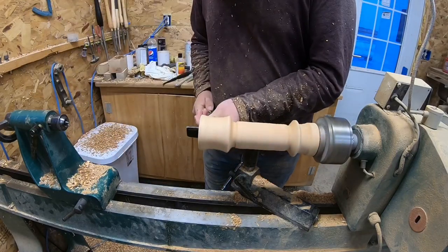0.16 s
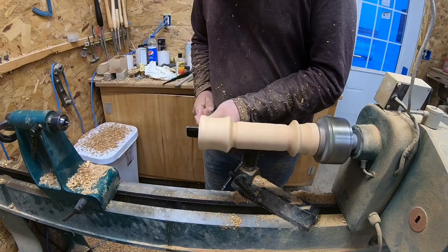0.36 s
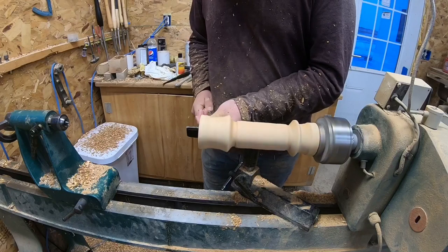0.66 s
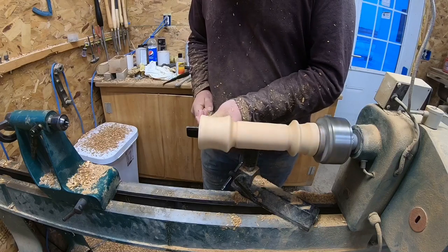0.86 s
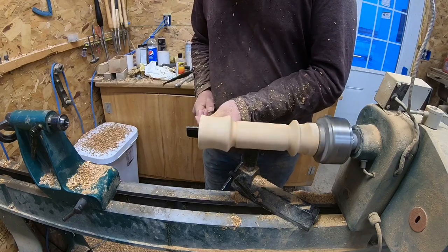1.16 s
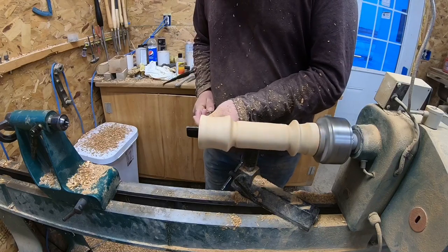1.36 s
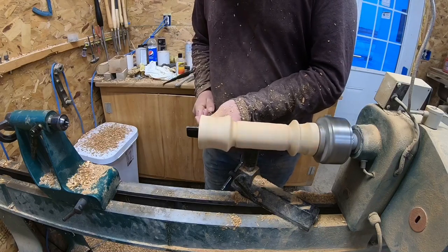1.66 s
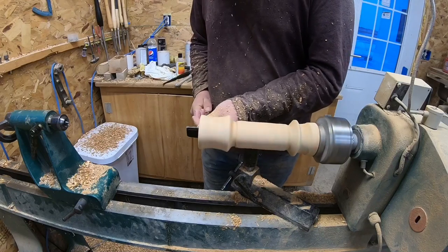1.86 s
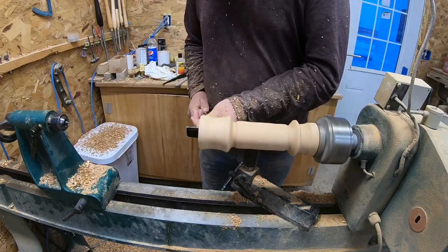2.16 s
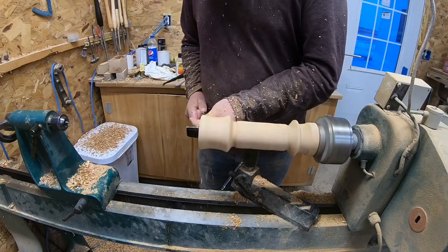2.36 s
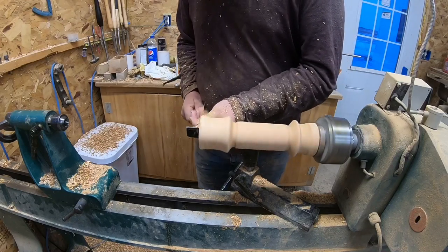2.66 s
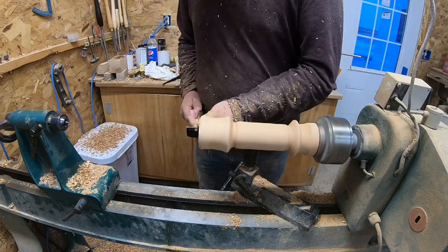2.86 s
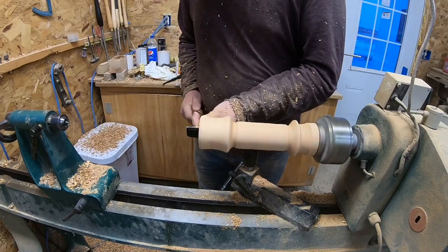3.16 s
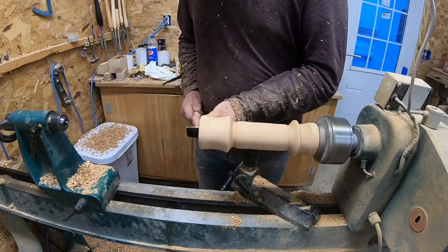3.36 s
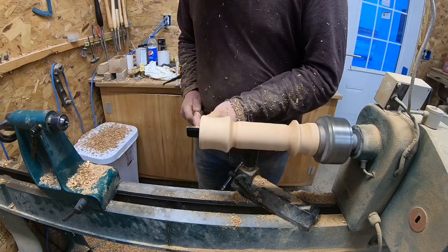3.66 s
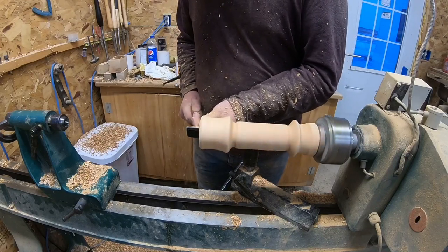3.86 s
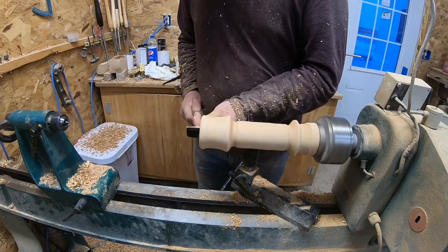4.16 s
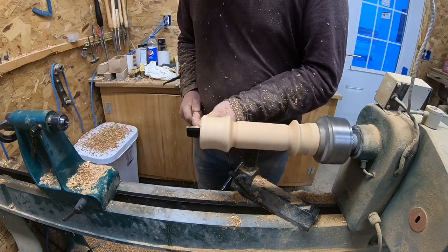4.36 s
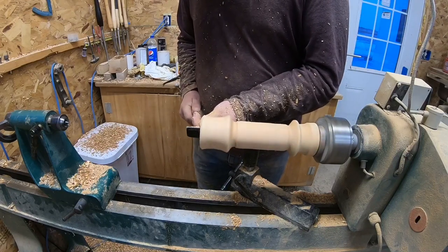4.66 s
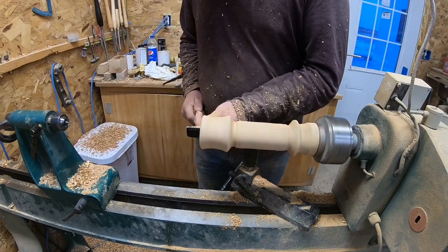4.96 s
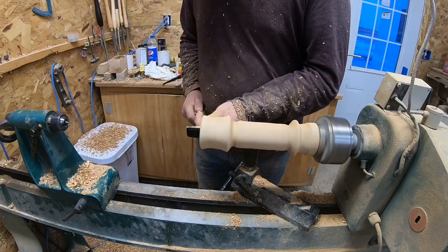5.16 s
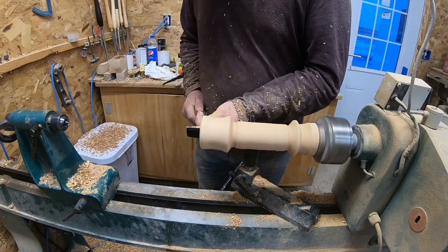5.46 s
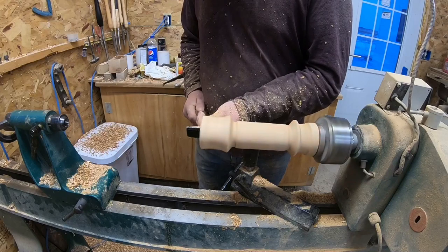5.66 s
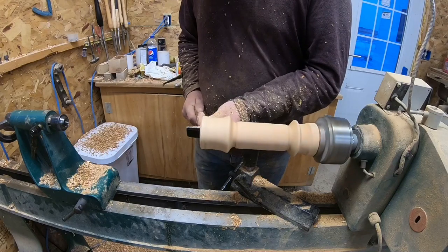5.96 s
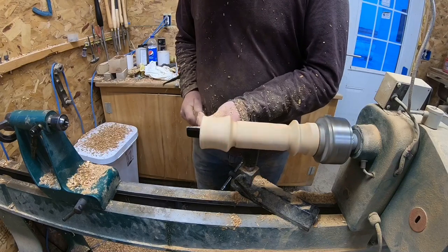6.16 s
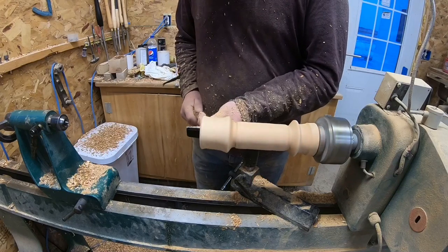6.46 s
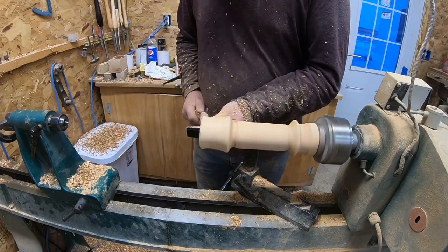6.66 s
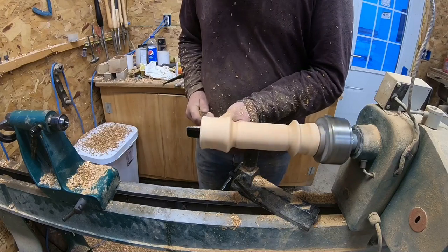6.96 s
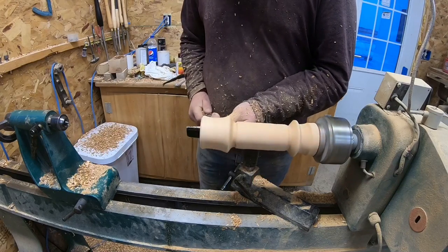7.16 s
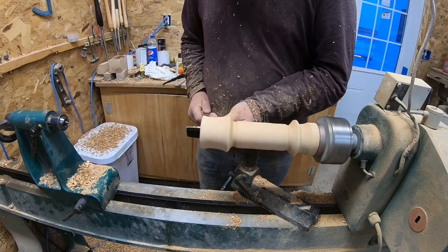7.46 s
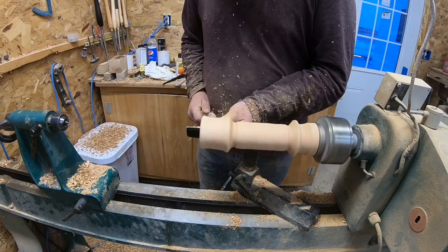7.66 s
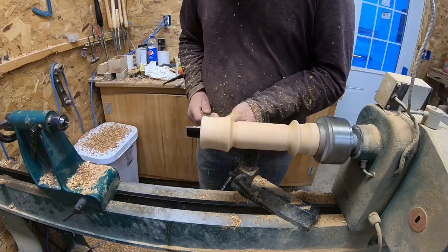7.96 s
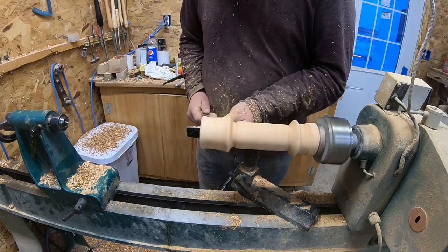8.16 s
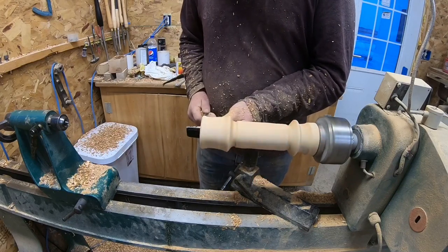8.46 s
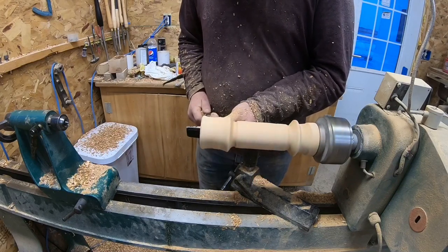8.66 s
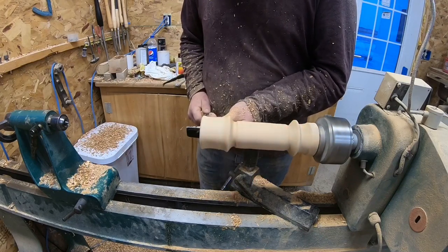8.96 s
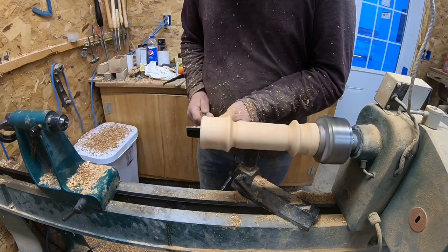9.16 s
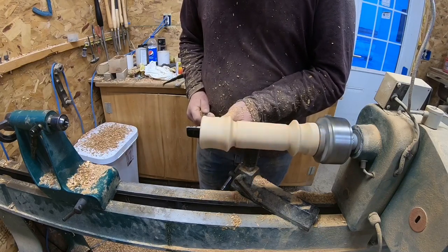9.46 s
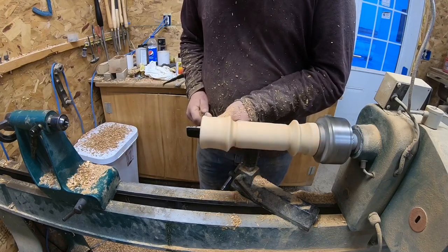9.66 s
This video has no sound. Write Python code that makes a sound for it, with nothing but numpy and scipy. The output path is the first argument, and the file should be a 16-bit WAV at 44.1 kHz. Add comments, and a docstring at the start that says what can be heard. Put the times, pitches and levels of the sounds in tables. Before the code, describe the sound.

Sandpaper pressed on spinning wood makes swelling, gritty rubbing strokes with a hollow moan, over the steady hum of a lathe.

```python
"""Abrasive pressed, stroke by stroke, on the end of a blank spinning in a wood lathe.
The grit hisses and rasps, pulsing once a turn; the overhanging blank rings at its bending note
and, in two spells under firm pressure, chatters by itself. The drive whines steadily underneath.
One microphone across the lathe bed, in a small workshop with wooden walls; its gain ducks on swells."""
import sys
import numpy as np
from scipy import signal
from scipy.fft import rfft, irfft, next_fast_len
from scipy.io import wavfile
from scipy.ndimage import uniform_filter1d, map_coordinates

SR = 44100
rng = np.random.default_rng(int(sys.argv[2]) if len(sys.argv) > 2 else 0)


def wav_record(signal):
    """Record a signal, one row per channel, as 16-bit PCM in the file named by sys.argv[1]."""
    frames = np.transpose(np.atleast_2d(signal))
    bounded = np.clip(frames, -1, 1)
    # unit amplitude maps onto the largest positive 16-bit level
    quanta = np.round(bounded * 32767).astype(np.int16)
    wavfile.write(sys.argv[1], SR, quanta)


N = 432621
TIME_S = np.arange(N) / SR
TURN_HZ = 64.23


def amp(db):
    """Decibels to gain."""
    return 10 ** (np.asarray(db) / 20)


def unit(x):
    """x scaled to rms 1."""
    return x / np.sqrt(np.mean(x ** 2) + 1e-20)


def bell(offset_s, width_s):
    """A bell curve, 1 at zero offset."""
    return np.exp(-np.minimum(np.abs(offset_s) / width_s, 10) ** 2)


def along(points, hz):
    """Rows of freq_hz, value, read on a log frequency axis."""
    freqs, values = np.transpose(points)
    return np.interp(np.log(hz + 1), np.log(freqs + 1), values)


def curves(rows):
    """One value per sample for each column after time_s."""
    times, *columns = np.transpose(rows)
    return [np.interp(TIME_S, times, column) for column in columns]


def wobble(rate):
    """A smooth random curve, rate knots a second."""
    knots = np.arange(N) * rate / SR
    coarse = knots[::32]
    return np.interp(knots, coarse, map_coordinates(rng.standard_normal(int(knots[-1]) + 4), [coarse]))


def angle(hz):
    """Running phase of a frequency curve."""
    return 2 * np.pi * np.cumsum(hz * np.ones(N)) / SR


def filtered(x, response):
    """x through a complex frequency response."""
    size = next_fast_len(N + SR // 2)
    return irfft(rfft(x, size) * response(np.fft.rfftfreq(size, 1 / SR)), size)[:N]


def coloured(x, spectrum):
    """x shaped by a spectrum, at rms 1."""
    return unit(filtered(x, lambda hz: amp(along(spectrum, hz))))


def resonate(x, modes, below, above):
    """x through modes, at rms 1; it falls steeply a factor below the first and above the last."""
    low_hz, high_hz = modes[0][0] / below, modes[-1][0] * above

    def response(f):
        ring = sum(amp(db) * 1j * f * width / (hz * hz - f * f + 1j * f * width)
                   for hz, width, db in modes)
        return ring / (1 + (f / high_hz) ** 8 + (low_hz / (f + 1)) ** 16)
    return unit(filtered(x, response))


def gliding(x, centre_hz, width_hz):
    """x through one resonance whose centre follows a curve, at rms 1."""
    carrier = np.exp(1j * angle(centre_hz))
    lowpass = signal.butter(2, width_hz / 2, fs=SR)
    return unit(np.real(carrier * signal.lfilter(*lowpass, x / carrier)))


# Decay of the small workshop: freq_hz, t60_s
ROOM_DECAY = [(200, 0.29), (2000, 0.16), (12000, 0.062)]


def workshop(x, wet_db):
    """x with the short answer of the wooden walls, which reaches the microphone just after it."""
    hz, t, noise = signal.stft(rng.standard_normal(SR // 2), SR, nperseg=256)
    decay = amp(-60 * t / along(ROOM_DECAY, hz)[:, None])
    tail = signal.istft(noise * decay, SR, nperseg=256)[1]
    echo = signal.fftconvolve(x, np.pad(tail, (SR // 300, 0)) / np.linalg.norm(tail))[:N]
    return (x + amp(wet_db) * echo) / np.sqrt(1 + amp(wet_db) ** 2)


# Steady whine of motor and belt drive: pitch_hz, relative_db
DRIVE_TONES = [(802, -46), (1006, -47.5), (1070.2, -41.5), (1174, -46.5), (1626, -55.5), (1704, -42.5),
               (1758, -52), (1883, -52), (2407, -52.5), (4452, -61), (4834, -59), (5324, -64),
               (5636, -60.5)]
# Tones of the spindle: turn_multiple, relative_db
SPINDLE_TONES = [(9, -46), (10, -44), (12, -40), (27, -46.5), (30, -48.5), (42, -58), (72, -60), (74, -62)]
# Rise and fall of the motor's hum: time_s, relative_db
HUM_LEVELS = [(0, -44), (1.9, -43), (2.26, -47.5), (2.6, -41.5), (4.9, -43.5), (6.1, -47.5), (7, -44),
              (9.8, -44.5)]


def drive(tones_db, hum_db, hum_hz):
    """Motor and spindle under the sanding: their tones waver a little with the speed."""
    speed = 1 + 0.000295 * wobble(3)

    def tone(hz):
        return np.sqrt(2) * amp(0.6 * wobble(20)) * np.sin(angle(hz * speed) + 0.15 * wobble(18))
    lines = list(DRIVE_TONES) + [(k * TURN_HZ, db) for k, db in SPINDLE_TONES]
    whine = sum(amp(db + 1.4 * wobble(4)) * tone(hz) for hz, db in lines)
    hum = amp(curves(HUM_LEVELS)[0] + hum_db) * tone(hum_hz)
    return hum + amp(tones_db) * whine


# Rumble of belt and fan: freq_hz, gain_db
RUMBLE_SPECTRUM = [(25, -32), (80, -23), (115, -17.5), (175, -4), (300, -0.5), (450, 2), (750, 11.5),
                   (900, 4.5), (1150, 8), (1400, -3), (2000, -19), (4000, -58)]
# Rush of the bearings: freq_hz, gain_db
BEARING_SPECTRUM = [(800, -37), (1300, 1.5), (1500, -2), (1740, 11), (2000, 3), (2400, -16), (3500, -11.5),
                    (5300, -6.5), (6400, -15), (9300, -70), (12000, -32), (15800, -14)]


def running_noise(rumble_db, bearings_db):
    """Belt and fan rumble evenly; the bearings' fluttering rush carries into the room."""
    rumble = coloured(rng.standard_normal(N), RUMBLE_SPECTRUM)
    bearings = coloured(rng.standard_normal(N) * amp(4.2 * wobble(120)), BEARING_SPECTRUM)
    return amp(rumble_db) * rumble + amp(bearings_db) * workshop(bearings, wet_db=-12)


# The abrasive's edge catches on three turns running: start_s, relative_db
EDGE_CATCHES = [(7.115, -23), (7.1293, -24.5), (7.147, -30)]
# Colour of one snag: freq_hz, gain_db
SNAG_SPECTRUM = [(80, -45), (250, -14), (700, -2), (2200, 0), (3500, -8), (6000, -10), (9000, -20),
                 (15000, -13)]


def catches(t60_s):
    """A short burst of tearing each time the edge snags."""
    bursts = sum(amp(db - 60 * np.abs(TIME_S - start) / t60_s) * (TIME_S >= start)
                 for start, db in EDGE_CATCHES)
    return np.sqrt(np.mean(bursts ** 2)) * coloured(bursts * rng.standard_normal(N), SNAG_SPECTRUM)


# Strokes of the abrasive on the end of the blank:
# start_s, end_s, attack_s, release_s, pressure_db, hiss_db, sizzle_db, turn_swing_db
HAND_STROKES = [(0.235, 1.066, 0.038, 0.054, -23.5, -32, -42, 6.5),
                (1.175, 1.342, 0.2, 0.13, -31.5, -37.5, -53, 7),
                (1.418, 1.61, 0.074, 0.036, -25.5, -30.5, -42, 5.5),
                (1.742, 1.886, 0.076, 0.042, -33, -35, -48, 4),
                (1.945, 2.354, 0.051, 0.31, -24, -32.5, -45, 2.5),
                (2.735, 2.751, 0.087, 0.032, -10, -21.5, -34, 3.5),
                (3.365, 3.474, 0.074, 0.13, -27, -33, -44, 2.5),
                (3.678, 3.896, 0.023, 0.11, -21, -28.5, -41, 3),
                (4.124, 4.336, 0.091, 0.097, -22.5, -31.5, -41, 2),
                (4.56, 4.74, 0.13, 0.074, -26, -33, -45, 3), (5.123, 5.529, 0.3, 0.23, -20, -28, -41, 0.5),
                (5.72, 6.355, 0.21, 0.46, -19, -31, -37, 4.5),
                (6.48, 6.984, 0.23, 0.13, -24, -35, -38.5, 8), (7.127, 7.182, .02, .15, -23, -41, -43, 4.5),
                (7.282, 7.695, 0.13, 0.16, -23, -41.5, -40, 6),
                (7.844, 8.3, 0.055, 0.36, -22.5, -41.5, -38.5, 2),
                (8.385, 8.53, 0.13, 0.22, -28, -42, -42, 4), (8.836, 9.10, 0.14, 0.15, -22, -40, -38, 0.5),
                (9.285, 9.444, 0.14, .10, -22, -37, -39, 6.5),
                (9.57, 9.64, .16, 0.084, -27, -38.5, -42, 5.5),
                (9.74, 9.797, 0.084, 0.098, -13.5, -32, -36, 4)]
# The fingers briefly push harder or ease off: time_s, added_pressure_db, added_bite_db
FINGER_PUSHES = [(0.34, -1.5, 4), (0.46, -10, 2.5), (0.88, 5, -2.5), (1.5, 1.5, 0.5), (2.735, -0.5, 3),
                 (2.88, -4, 1), (3.16, 5, -2.5), (4.21, 5, -1), (4.65, 4, 1), (5.21, -3.5, 4.5),
                 (5.275, 2.5, 0), (5.385, 3.5, -1), (5.8, 3, 2), (6.37, 1.5, 2), (6.56, 7.5, 2.5),
                 (6.73, -5, 3.5), (6.87, 5.5, 1), (7.32, 6, 1.5), (7.5, 5.5, -1), (7.875, 7, 0.5),
                 (8.07, 5, 0.5), (8.23, 8.5, -2.5), (8.87, 6.5, 3), (9.09, 8, -2.5), (9.32, 7, 1.5)]


def hand():
    """Pressure, bite, hiss and sizzle in dB: each stroke lands, arches in pressure and lifts."""
    press, hiss, sizzle = -35.5, -54, -55  # the abrasive grazes between strokes
    edge_db = 22.5  # fall over one attack or release time
    lag = 1.15  # pressure comes and goes this many times more slowly than the hiss
    for start, end, attack, release, press_db, hiss_db, sizzle_db, _ in HAND_STROKES:
        lift_db = edge_db * (np.maximum(start - TIME_S, 0) / attack
                             + np.maximum(TIME_S - end, 0) / release)
        arch_db = 3 * np.minimum(((2 * TIME_S - start - end) / (end - start)) ** 2, 1)
        press = np.maximum(press, press_db - arch_db - lift_db / lag)
        hiss = np.maximum(hiss, hiss_db - lift_db)
        sizzle = np.maximum(sizzle, sizzle_db - lift_db)
    bite = -29
    for time_s, push_db, bite_db in FINGER_PUSHES:
        swell = bell(TIME_S - time_s, width_s=0.043)
        press = press + push_db * swell
        bite = bite + bite_db * swell
    return press, bite + 0.44 * press, hiss, sizzle  # pressure deepens the bite


def contact(ridges_db, flutter_db):
    """Contact force near rms 1: the high side comes round once a turn; the wood adds changing ridges."""
    turn = angle(TURN_HZ + 0.204 * wobble(2.09))
    swing_db, = curves([((start + end) / 2, swing) for start, end, *_, swing in HAND_STROKES])
    ridges = sum(wobble(3.02) * np.cos(k * turn) + wobble(3.254) * np.sin(k * turn) for k in range(2, 6))
    force = amp(swing_db * np.cos(turn) + ridges_db * ridges + flutter_db * wobble(40))
    return force / np.sqrt(np.abs(uniform_filter1d(force ** 2, SR // 8)))


def grains(rate, spread_db):
    """Grit points tearing fibres: tiny impacts of random size, rate a second."""
    hit = rng.random(N) < rate / SR
    return unit(hit * rng.choice([-1, 1], N) * amp(spread_db * rng.standard_normal(N)))


def wood_surface(rate, repeat, memory):
    """Grit on spinning wood: the share `repeat` comes back every turn, until those bumps wear away."""
    period = round(SR / TURN_HZ)
    turns = np.pad(grains(rate, spread_db=0.5), (0, -N % period)).reshape(-1, period)
    bumps = unit(signal.lfilter([1], [1, -memory], turns, axis=0).ravel()[:N])
    return np.sqrt(1 - repeat) * grains(rate, spread_db=3) + np.sqrt(repeat) * bumps


# Spells of self-excited chatter: start_s, end_s
CHATTER_SPELLS = [(5.261, 5.5), (5.761, 6.16)]


def chatter_lock():
    """Pitch and share of the chatter: it locks in for a spell, and goes slightly flat as it lets go."""
    away_s = np.min([np.abs(TIME_S - np.clip(TIME_S, *spell)) for spell in CHATTER_SPELLS], axis=0)
    lock = bell(away_s, width_s=0.091)
    return 629.5 - 10 * (1 - lock), 0.78 * lock


# The turning blank splits the chatter into sidebands: offset_turn_rates, relative_db
CHATTER_SIDEBANDS = [(-2, -13), (-1, -21), (0, 0), (1, -18), (2, -25)]
# Instants at which the chatter loses its grip: time_s
SLIP_TIMES = [5.294, 5.356, 5.426, 5.9]


def chatter(pitch_hz, squeal_db, slip_db):
    """Stick and slip hold the blank on one note with a faint fourth harmonic; it dips at each slip."""
    note, turn = angle(pitch_hz + 2.5 * wobble(70)), angle(TURN_HZ)
    tone = unit(sum(amp(db + 1.53 * wobble(25)) * np.sin(note + k * turn + rng.uniform(0, 2 * np.pi))
                    for k, db in CHATTER_SIDEBANDS))
    slipping = sum(bell(TIME_S - time_s, width_s=0.007) for time_s in SLIP_TIMES)
    return amp(slip_db * slipping) * (tone + amp(squeal_db) * np.sin(4 * note))


# Bending modes of the blank in the chuck: pitch_hz, width_hz, gain_db
BENDING_MODES = [(509.5, 17.6, -9), (617, 7.9, -15), (611.4, 5, 5), (635.7, 9.4, 1.5)]


def blank(force, press_db, ring_db, chatter_db):
    """Friction rings the blank's bending modes; in each spell they lock into one chattering note."""
    pitch_hz, share = chatter_lock()
    friction = force ** 0.53 * wood_surface(rate=5000, repeat=0.34, memory=0.69)
    ring = resonate(friction, BENDING_MODES, below=0.99, above=1.146)
    # the ring's random swells are evened out, so it stays near the level the pressure sets
    power = uniform_filter1d(uniform_filter1d(ring ** 2, SR // 22), SR // 30)
    ring = ring / np.sqrt(np.abs(power) + 0.085)
    # the abrasive grabs and lets go some tens of times a second
    ring = unit(ring * amp(1.2 * wobble(35)))
    free = amp(ring_db) * np.sqrt(1 - share) * ring
    locked = amp(chatter_db) * np.sqrt(share) * chatter(pitch_hz, squeal_db=-28, slip_db=-9)
    return amp(press_db) * (free + locked)


# Resonances at the contact shift with the grip:
# time_s, paper_buzz_hz, lower_hiss_hz, upper_hiss_hz, top_hz, lower_hiss_db
GRIP_RESONANCES = [(0, 4960, 10750, 11780, 15300, -7), (2.4, 4600, 10940, 12030, 15100, -7),
                   (3.4, 4600, 11340, 12340, 14500, -6), (6.1, 4860, 11430, 12260, 14300, -0.5),
                   (7.2, 5100, 11730, 12470, 14620, -8), (9.8, 5240, 11400, 12400, 14300, -5)]
# Broad hiss of the scratches: freq_hz, gain_db
HISS_SPECTRUM = [(7000, -25), (8900, -21.5), (9900, -6.5), (10500, -9), (12300, 0), (13200, -6),
                 (16000, -18)]
# Fine sizzle above it: freq_hz, gain_db
SIZZLE_SPECTRUM = [(7000, -42), (9000, -29), (10000, -2.5), (12500, -12), (13900, 5), (15200, 2),
                   (16000, 1)]


def grit_hiss(force, hiss_db, sizzle_db):
    """The finest scratches: a broad hiss and sizzle in which three high resonances sing."""
    def scratches():
        return force * grains(rate=18000, spread_db=4)
    _, lower_hz, upper_hz, top_hz, lower_db = curves(GRIP_RESONANCES)
    lower = amp(lower_db) * gliding(scratches(), lower_hz, width_hz=380)
    upper = gliding(scratches(), upper_hz, width_hz=470)
    top = gliding(scratches(), top_hz, width_hz=370)
    hiss = amp(-2.5) * (lower + upper) + amp(-7.5) * coloured(scratches(), HISS_SPECTRUM)
    sizzle = amp(-4) * top + amp(-2) * coloured(scratches(), SIZZLE_SPECTRUM)
    return amp(hiss_db) * hiss + amp(sizzle_db) * sizzle


# Tearing fibres, heard across the lathe bed: freq_hz, gain_db
RASP_SPECTRUM = [(150, -29.5), (400, -3.5), (900, -1.5), (1400, 2.5), (2400, 3.5), (3100, -2), (4100, -1.5),
                 (5500, 0.5), (6100, -6), (7700, -9.5), (8700, -15.5), (11000, -25), (16000, -35)]
# Higher modes of blank and holder: pitch_hz, width_hz, gain_db
BODY_MODES = [(814, 8.1, 0), (1176.6, 20.3, 5.5), (1616, 10.5, 5.5), (1728, 68, -1.5), (1912, 18, -1.5),
              (2271, 32, 1.5), (2597, 55, -6)]


def grit_rasp(force, bite_db, tearing_db, paper_db, body_db):
    """Coarser tearing radiates directly, buzzes in the abrasive and shakes the higher modes."""
    _, chatter_share = chatter_lock()
    level = amp(bite_db - 2 * chatter_share)  # a chattering blank skips over the grit and is torn less
    push = force ** 0.6
    tearing = coloured(push * wood_surface(rate=14000, repeat=0.072, memory=0.954), RASP_SPECTRUM)
    buzz = push * wood_surface(rate=16000, repeat=0.11, memory=0.56)
    paper_hz = curves(GRIP_RESONANCES)[0]
    overtone = gliding(buzz, 1.48 * paper_hz, width_hz=1000)
    paper = gliding(buzz, paper_hz, width_hz=410) + amp(-5.5) * overtone
    shaking = push * wood_surface(rate=8000, repeat=0.48, memory=0.915)
    body = resonate(shaking, BODY_MODES, below=2.0, above=1.25)
    return level * (amp(tearing_db) * tearing + amp(paper_db) * paper + amp(body_db) * body)


def scene():
    """The sanding and the running lathe, in mono from across the lathe bed."""
    press_db, bite_db, hiss_db, sizzle_db = hand()
    force = contact(ridges_db=1.45, flutter_db=1.5)
    hiss = workshop(grit_hiss(force, hiss_db, sizzle_db), wet_db=-22)
    rasp = grit_rasp(force, bite_db, tearing_db=2, paper_db=-11, body_db=3)
    scraping = workshop(rasp + catches(t60_s=0.07), wet_db=-9)
    moan = blank(force, press_db, ring_db=-1, chatter_db=5.5)
    whine = drive(tones_db=-0.5, hum_db=-1, hum_hz=358.8)
    rush = running_noise(rumble_db=-39, bearings_db=-39.5)
    return (whine + rush + hiss + scraping + moan)[None]


def record(dry):
    """The camera microphone ducks on loud swells, recovers slowly and keeps nothing above top_hz."""
    knee_db, cut_per_db, recover_db_per_s, top_hz = -19.5, 0.45, 18, 15780
    loud_db = 10 * np.log10(np.abs(uniform_filter1d(dry[0] ** 2, SR // 25)) + 1e-12)
    recovery_db = recover_db_per_s * TIME_S
    held_db = np.maximum.accumulate(loud_db + recovery_db) - recovery_db
    gain = amp(-0.02 - cut_per_db * np.maximum(held_db - knee_db, 0))
    return filtered(gain * dry[0], lambda hz: hz < top_hz)[None]


dry = scene()
out = record(dry)
wav_record(out)
```